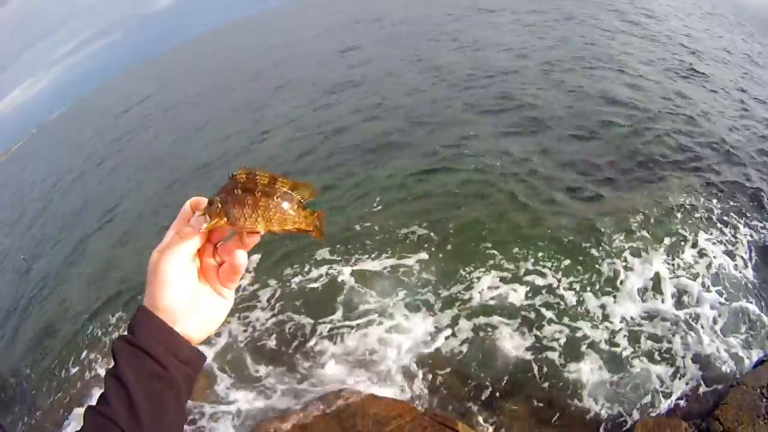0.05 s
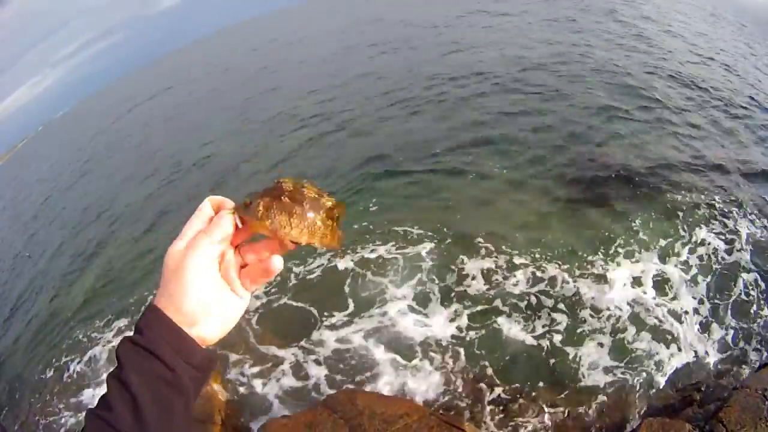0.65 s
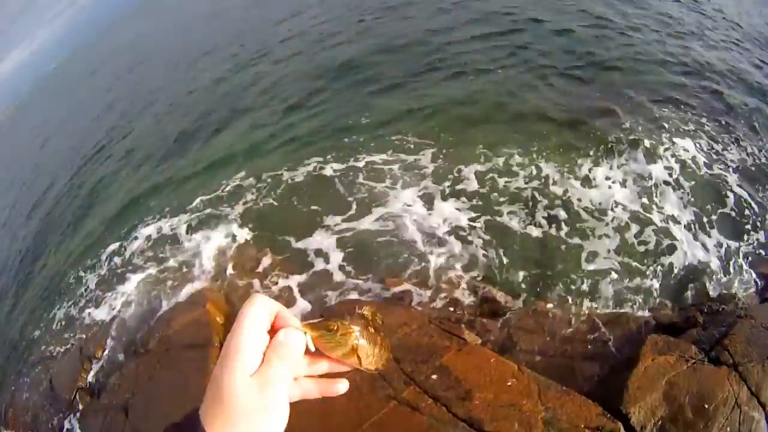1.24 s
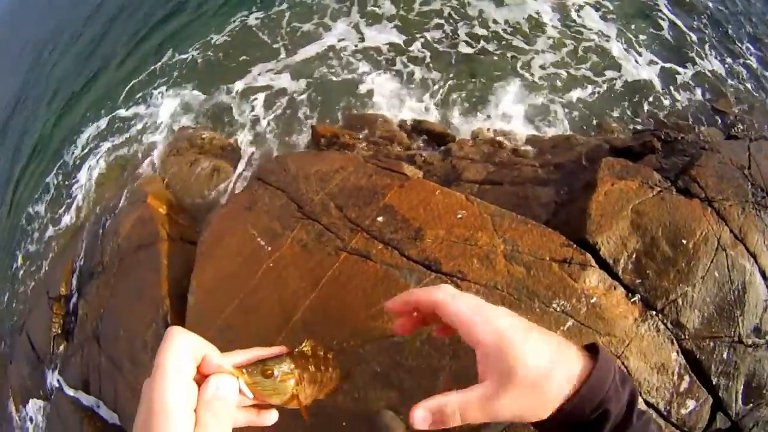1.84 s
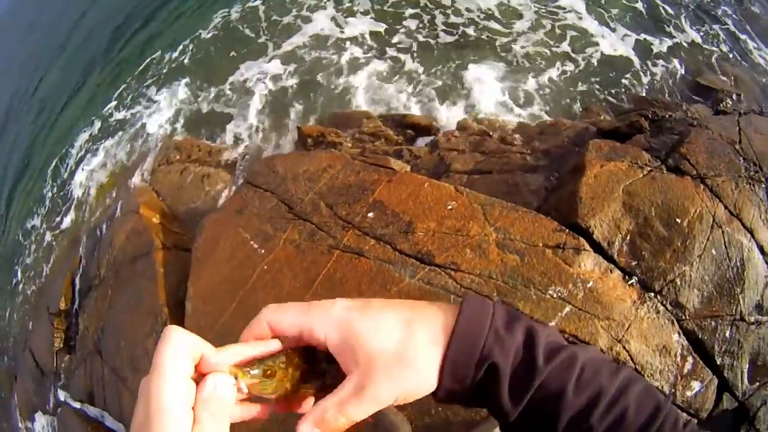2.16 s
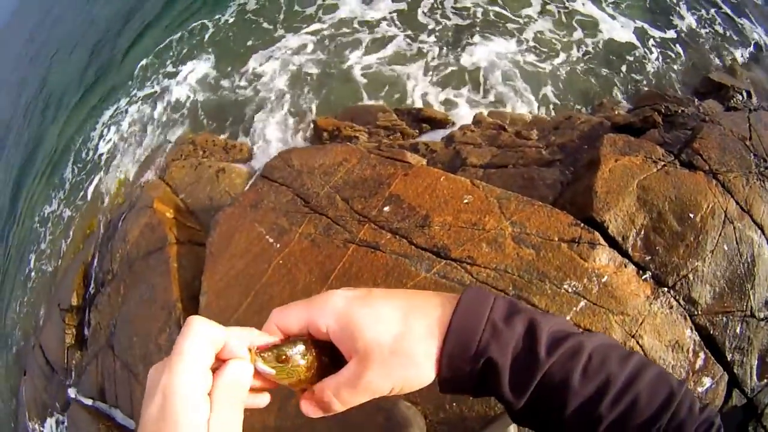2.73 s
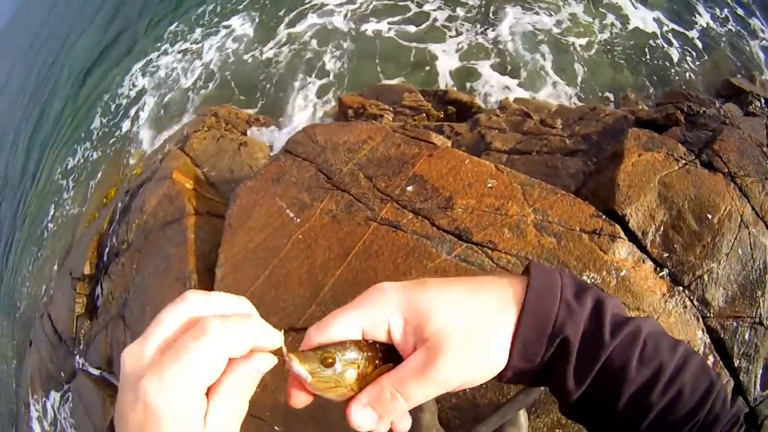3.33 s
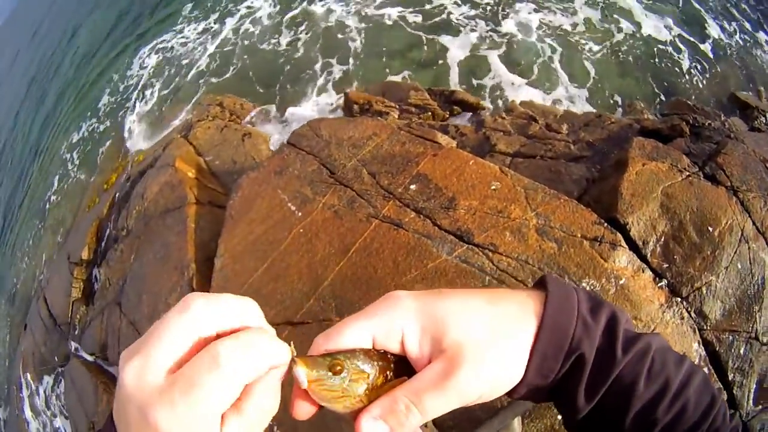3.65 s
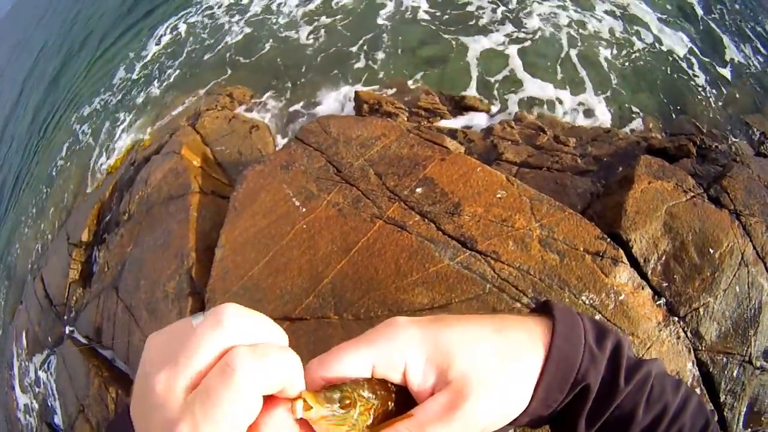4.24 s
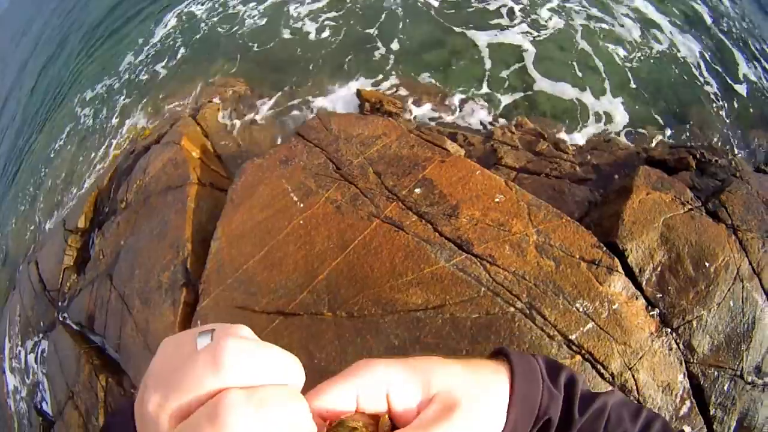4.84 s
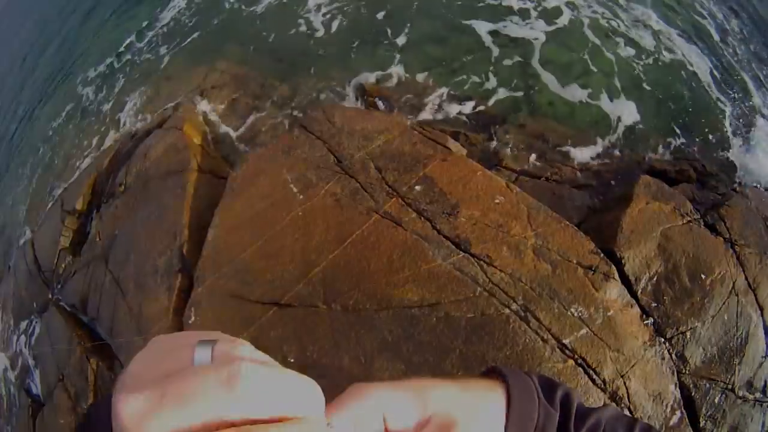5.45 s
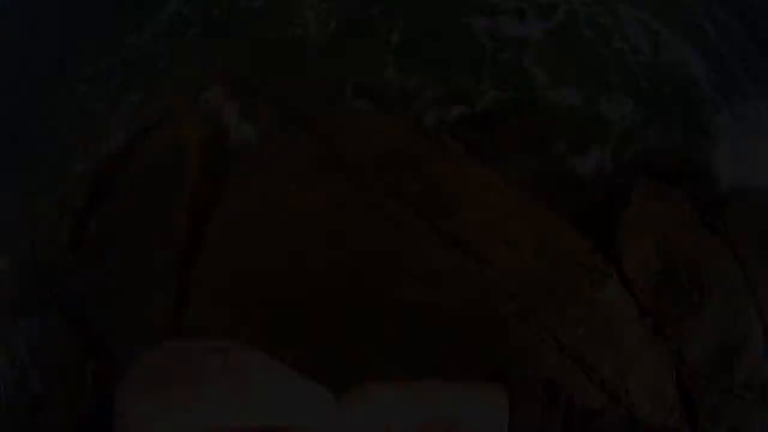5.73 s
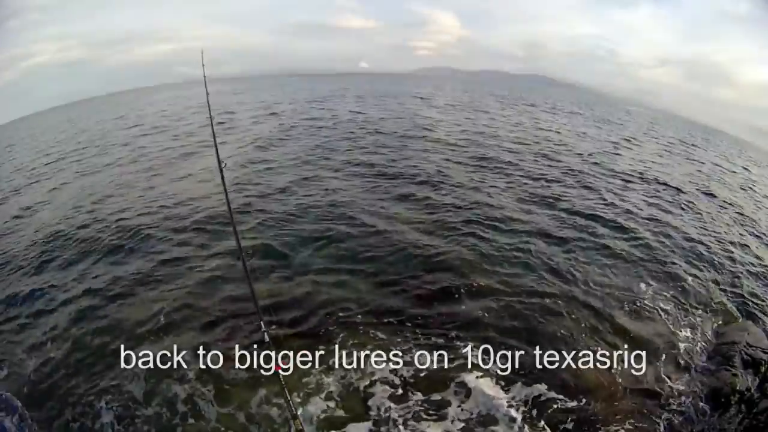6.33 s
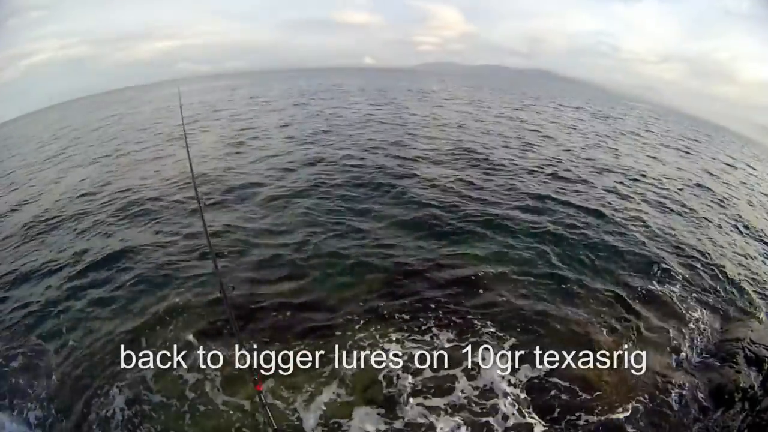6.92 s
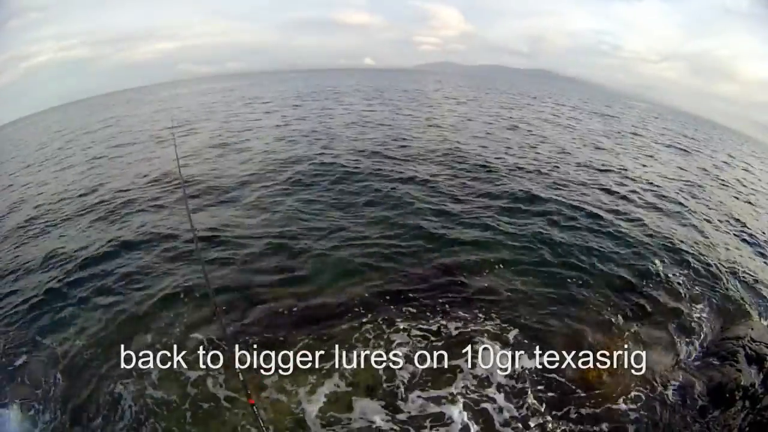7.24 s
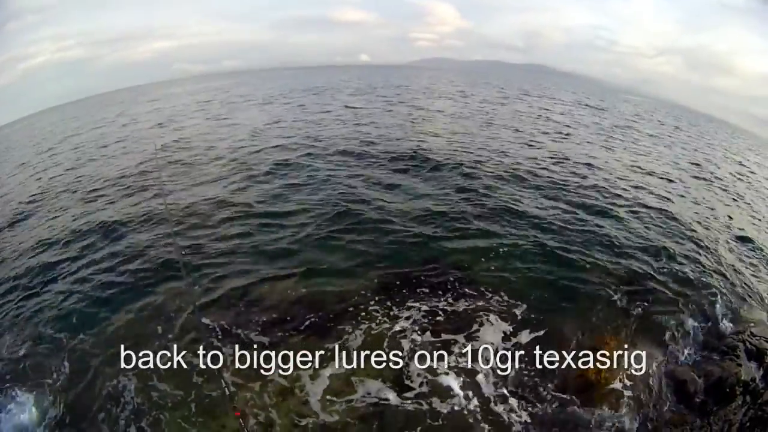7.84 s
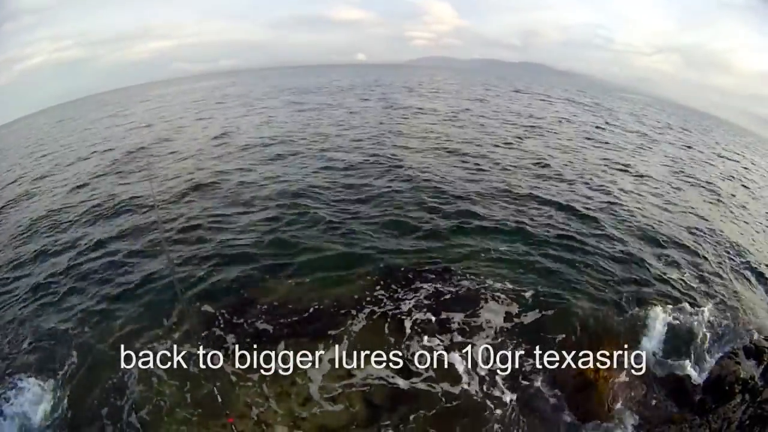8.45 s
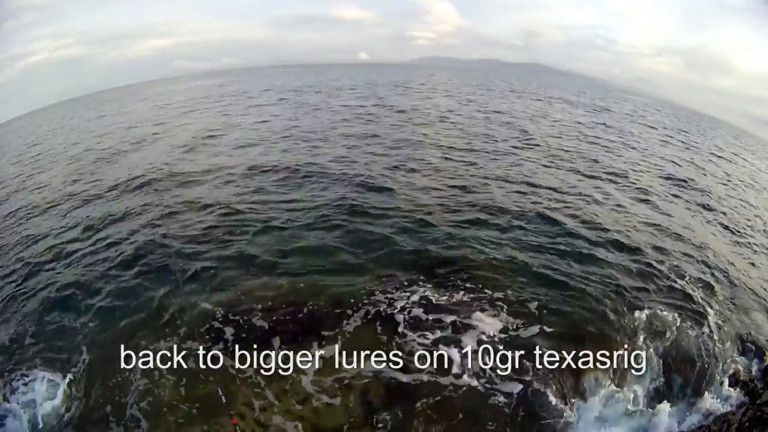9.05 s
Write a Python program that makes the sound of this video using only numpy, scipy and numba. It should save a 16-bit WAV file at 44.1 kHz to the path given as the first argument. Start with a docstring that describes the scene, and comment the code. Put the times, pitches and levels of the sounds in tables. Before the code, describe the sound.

Sea water washes and fizzes over shore rocks, faint, hollow and hissy as if heard from inside a closed waterproof housing.

```python
"""A rocky shore, heard faintly from inside a closed waterproof housing whose walls and cavity ring.
Low swell washes over the rocks: foam fizzes, bubbles burst and a few drops fall back into the water.
Each bubble is a damped resonator; thousands together make the wash, which swells with every wave.
A low flutter, soft pats and a faint rumble sit mostly on the right.
Two stretches at the shore follow each other through a fade to silence."""
import sys
import numpy as np
from scipy import signal
from scipy.fft import rfft, irfft
from scipy.io import wavfile
from numba import njit

SR = 44100
rng = np.random.default_rng(int(sys.argv[2]) if len(sys.argv) > 2 else 0)


def bounce(signal):
    """Save signal as a 16-bit WAV file at the path given by the first command-line argument."""
    frames = np.transpose(np.atleast_2d(signal))
    limited = np.clip(frames, -1, 1)
    pcm = np.round(limited * 32767).astype(np.int16)
    wavfile.write(sys.argv[1], SR, pcm)


N = 404838
TIME = np.arange(N) / SR
FREQ = np.maximum(np.arange(N // 2 + 1) * SR / N, 1)
CHANGE_S = 5.86  # the second stretch begins

# the low band of the wash, below about 720 Hz, swells and fades: (time [s], level [dB])
LOW_BAND_LEVEL = [(0, 0.5), (1.3, -3), (1.75, 7), (2.5, 11.5), (2.902, -16), (3.9, 11), (4.4, -6.5),
                  (4.8, 10), (5.3, 10.5), (5.7, 6.5), (6.4, -13), (7.95, -19), (8.45, 7), (9.152, 12.5)]


def undb(db):
    """Decibels to amplitude ratio."""
    return 10 ** (np.asarray(db) / 20)


def unit(x):
    """Normalisation to rms 1."""
    return x / np.sqrt(np.mean(x ** 2))


def contour(points):
    """Linear interpolation of (time [s], level [dB]) points."""
    return np.interp(TIME, *np.transpose(points))


def shape_db(points, freq):
    """Interpolation of (frequency [Hz], level [dB]) points on a log-frequency axis."""
    hz, db = np.transpose(points)
    return np.interp(np.log(freq), np.log(hz), db)


def colour(x, points):
    """Zero-phase filtering by a curve of (frequency [Hz], level [dB]) points."""
    return irfft(rfft(x) * undb(shape_db(points, FREQ)), N)


def walk(rate_hz):
    """Random modulation: straight lines join rate_hz Gaussian values a second."""
    return np.interp(TIME * rate_hz, np.arange(4096), rng.standard_normal(4096))


@njit
def bubbles(start_s, hz, cycles, amplitude, rise):
    """Damped resonance: a bubble decays 60 dB over its cycles, rising in pitch as it nears the surface."""
    out = np.zeros(N)
    for k in range(len(start_s)):
        first, length = int(start_s[k] * SR), int(cycles[k] / hz[k] * SR) + 2
        gain, phase = amplitude[k], 0.
        decay = np.exp(-np.log(1000) / length)
        for i in range(max(0, min(length, N - first))):
            phase += 2 * np.pi * hz[k] * (1 + rise * i / length) / SR
            gain *= decay
            out[first + i] += gain * np.sin(phase)
    return out


def foam(count=60000, spread_db=1.64, cycles=26, bubble_db=-5.5, rush_db=-0.5):
    """Superposition: thousands of near bubbles ring each second, while distant ones blur into noise."""
    when, pitch, ring, strength = rng.random((count, 4)).T
    hz = 700 + 10500 * pitch
    exponential = np.minimum(-np.log(1 - strength), 5)
    amplitude = undb(spread_db * exponential) * np.sqrt(hz)  # equal energy for high and low rings
    near = bubbles(when * N / SR, hz, cycles * (0.2 + 1.9 * ring), amplitude, rise=0.19)
    return undb(bubble_db) * unit(near) + undb(rush_db) * rng.standard_normal(N)


def surge(crest_s, rise_s, fall_s):
    """Power envelope of moving water: a Gaussian rise to the crest, then exponential decay."""
    since = TIME - crest_s
    exponent = np.where(since < 0, (since / rise_s) ** 2, since / fall_s)
    return np.exp(-np.minimum(exponent, 60))


def surf(foam_lag_s=0.079, foam_linger=1.11, foam_gain_db=2):
    """Incoherent addition: calm water, waves and splashes sum in power to gains of churn, fizz, spray."""
    # wash between waves, a row for each stretch: (churn [dB], fizz [dB], spray [dB])
    calm = [(-1.0, -3, -4), (-2.5, -4.5, -15)]
    # waves run up the rocks and drain: (time [s], rise [s], drain [s], level [dB], foam re water [dB])
    waves = [(0.05, 0.3, 0.7, -12, 7.5), (1.68, 0.13, 0.38, 2, -6.5), (2.15, 0.41, 0.68, -0.5, -5.5),
             (4.1, 0.81, 1.3, -18.5, 11.5), (5.32, 0.61, 0.56, -2, -1), (7.05, 0.38, 1.08, 1.5, -5),
             (8.2, 0.33, 1.9, -3, -4.5), (8.95, 0.069, 0.77, -6, -3)]
    # a crest slaps the rock: (time [s], level [dB], foam re water [dB])
    splashes = [(0.54, -14.5, 10), (1.56, -6, -8), (4.1, -2.5, -1), (4.96, -2, -7), (5.21, 2.5, -4),
                (5.3, 3, -4.5), (5.44, 2.5, -7), (6.68, -8.5, 4), (7.06, -8, 0), (7.36, -5, 0),
                (7.73, -10, 5), (8.11, 0, -10), (8.87, -0.5, -3.5), (9.15, 4.5, -4)]
    water = froth = 0
    for s, rise, drain, db, foam_db in waves:
        water += undb(db) ** 2 * surge(s, rise, drain)
        froth += undb(db + foam_db) ** 2 * surge(s + foam_lag_s, rise, drain * foam_linger)
    for s, db, foam_db in splashes:
        slap = surge(s, rise_s=0.031, fall_s=0.02)
        water += undb(db) ** 2 * slap
        froth += undb(db + foam_db) ** 2 * slap
    froth *= undb(foam_gain_db) ** 2
    return [np.sqrt(undb(np.where(TIME < CHANGE_S, before, after)) ** 2 + power)
            for before, after, power in zip(*calm, (water, froth, froth))]


def wash(edges_hz=(720, 4300, 6000), slop_db=0.22, lap_db=0.5, flicker_db=0.98, waver_db=6.5, gain_db=-57.5):
    """Amplitude modulation: of four bands, the upper three swell with the surf; each flickers alone."""
    spectrum = rfft(foam())
    high_passes = [1] + [1 / (1 + (edge / FREQ) ** 16) for edge in edges_hz] + [0]
    common_db = slop_db * walk(35) + lap_db * walk(8)
    low_gain = undb(contour(LOW_BAND_LEVEL) + waver_db * walk(9.8))  # the low band wavers at random
    out = 0
    for lower, upper, gain in zip(high_passes, high_passes[1:], [low_gain] + surf()):
        band = irfft(spectrum * (lower - upper), N)
        out += band * gain * undb(common_db + flicker_db * walk(70))
    return undb(gain_db) * out


def rock_echo(water, delay_s=0.0021, sway=0.13, echo_db=-14):
    """Comb filtering: the wash interferes with its reflection off the rock, whose path sways with it."""
    lag_s = delay_s * (1 + sway * walk(2.5))
    return water + undb(echo_db) * np.interp(TIME - lag_s, TIME, water)


def housing_response(resonances, size=2048):
    """Transmission through a resonant wall, as a minimum-phase impulse response."""
    # what the wall lets through: (frequency [Hz], level [dB])
    wall = [(400, -20.5), (600, -12), (1200, -18), (1370, -23), (1470, -10.5), (2900, -2.5), (4300, -1),
            (6000, -2), (7800, -5), (9500, -11), (14000, -18)]
    freq = np.maximum(np.arange(size // 2 + 1) * SR / size, 1)
    peaks_db = sum(lift * .5 ** ((2 * (freq - hz) / width) ** 2) for hz, width, lift in resonances)
    cepstrum = irfft(np.log(undb(shape_db(wall, freq) + peaks_db)))
    cepstrum[1:size // 2] *= 2  # folding the cepstrum makes the response causal
    cepstrum[size // 2 + 1:] = 0
    return irfft(np.exp(rfft(cepstrum)))


def housing():
    """Directional resonance: a response for each place of the loudest water, and its share over time."""
    # resonances and notches of the housing, by place: (frequency [Hz], bandwidth [Hz], gain [dB])
    open_water = [(1406, 685, 16), (1860, 204, 9.5), (2360, 670, 9), (3350, 260, 10), (3910, 410, 7),
                  (4810, 520, 9.5), (5340, 570, 8), (6000, 460, -3), (6720, 640, 6), (8650, 190, 8)]
    edge = [(1353, 814, 15.5), (1878, 220, 6.5), (2328, 576, 11), (3388, 290, 8.5), (3970, 290, 3),
            (4916, 640, 11.7), (5520, 280, 8), (6770, 950, 7), (8400, 310, 3), (2970, 79, -11)]
    below = [(1486, 1190, 9.9), (1850, 240, 6.2), (2480, 550, 9.9), (3330, 330, 9.7), (3850, 550, 3.1),
             (4820, 390, 11.4), (5430, 520, 8.2), (6830, 630, 9.8), (8730, 440, 6.8)]
    ahead = [(1610, 920, 11.7), (2400, 240, 7.8), (3415, 135, 6.9), (3895, 270, 6.5), (4936, 490, 8.6),
             (5380, 210, 8), (6600, 290, 4), (7270, 340, 5.7), (8570, 350, 8.5)]
    side = [(1530, 1120, 14.7), (2540, 840, 6.7), (3390, 430, 12.5), (3890, 310, 8.2), (4970, 920, 11.1),
            (5450, 200, 4.4), (5900, 460, 6.5), (6800, 520, 4.4), (8900, 4400, 4)]
    # where the loudest water is: (time [s], place [name])
    loudest_water = [(1.3, "open"), (1.6, "below"), (2.35, "below"), (3.3, "edge"), (5.8, "edge"),
                     (5.9, "ahead"), (7.7, "ahead"), (8.8, "side")]
    by_place = {"open": open_water, "edge": edge, "below": below, "ahead": ahead, "side": side}
    responses = np.array([housing_response(resonances) for resonances in by_place.values()])
    times, places = zip(*loudest_water)
    shares = np.array([np.interp(TIME, times, np.array(places) == place) for place in by_place])
    return responses, shares


def flutter(rate_hz=44, steepness=3.3, left_db=-11):
    """Random gating: low noise flickers on and off, independently on each side."""
    # spectrum of the flutter: (frequency [Hz], level [dB])
    spectrum = [(50, -15), (110, 7.5), (150, 0), (220, 2), (300, -1.5), (400, -15), (650, -23), (900, -20),
                (2500, -66)]
    # its slow swell: (time [s], level [dB])
    swell = [(0, -59.5), (1.3, -50), (1.7, -56), (2.8, -55), (3.7, -52.5), (4.2, -55.5), (5.2, -62.5),
             (6.0, -54.5), (6.6, -59.5), (9.1, -55)]
    gates = np.array([unit(1 + np.tanh(steepness * (walk(rate_hz) - .5))) for side in range(2)])
    noise = colour(rng.standard_normal((2, N)), spectrum)
    return noise * gates * undb(contour(swell)) * undb([[left_db], [0]])


def rumble(left_db=-20, waver_db=3.0, low_band_share=0.33, first_db=0.36, second_db=1.0):
    """Slow amplitude modulation: faint, deep noise wavers and swells with the low band of the wash."""
    # spectrum of the rumble: (frequency [Hz], level [dB])
    spectrum = [(15, -36.5), (45, -39.5), (90, -44.5), (140, -65), (280, -62.5), (430, -70.5), (1000, -89)]
    stretch_db = np.where(TIME < CHANGE_S, first_db, second_db)
    db = stretch_db + low_band_share * contour(LOW_BAND_LEVEL) + waver_db * np.tanh(walk(12))
    return colour(rng.standard_normal((2, N)), spectrum) * undb(db) * undb([[left_db], [0]])


def pats(reference_hz=390, left_db=-15, steepness=4.0, size=8192):
    """Windowed noise: each soft pat is a short, dull burst whose spectrum scales with its pitch."""
    # spectrum of a pat pitched at reference_hz: (frequency [Hz], level [dB])
    spectrum = [(60, -51), (200, -0.5), (300, 1), (500, -0.5), (760, -5.5), (1020, -13), (2500, -24.5)]
    # soft low pats: (time [s], level [dB], duration [s], pitch [Hz])
    bursts = [(0.099, -67.5, .045, 400), (0.236, -70, 0.067, 200), (0.463, -68.5, 0.049, 200),
              (0.573, -71, 0.056, 190), (0.76, -72, 0.025, 227), (0.868, -64, 0.013, 400),
              (1.527, -68, 0.033, 380), (1.857, -68, .012, 380), (1.938, -64, 0.046, 370),
              (2.057, -61, 0.031, 345), (2.152, -62, 0.023, 330), (2.286, -67.5, 0.045, 430),
              (2.366, -66.5, 0.057, 350), (2.437, -63, 0.038, 350), (2.629, -60, 0.03, 380),
              (2.692, -69.5, 0.022, 210), (2.786, -62.5, 0.022, 343), (2.89, -62.5, 0.073, 324),
              (3.073, -63, 0.043, 362), (3.171, -64.5, 0.042, 286), (3.252, -61, 0.035, 350),
              (3.365, -63, 0.018, 380), (3.401, -64, 0.045, 356), (3.474, -64.5, 0.054, 430),
              (3.583, -64, 0.026, 350), (3.767, -63, 0.018, 258), (3.837, -64, 0.012, 440),
              (3.913, -60.5, 0.041, 256), (3.995, -64, .018, 342), (4.275, -71, 0.036, 219),
              (4.397, -69, .026, 230), (4.658, -71, 0.047, 320), (4.76, -70, .028, 340),
              (4.903, -68, 0.047, 380), (5.394, -64.5, 0.024, 280), (6.109, -61, 0.041, 400),
              (6.196, -62.5, 0.012, 260), (6.317, -64, 0.012, 380), (6.451, -67.5, 0.018, 307),
              (6.585, -66.5, 0.026, 294), (6.685, -64.5, 0.01, 480), (6.788, -61, 0.016, 413),
              (6.881, -60, 0.0062, 450), (6.986, -59, 0.0075, 410), (7.085, -60.5, 0.013, 400),
              (7.188, -62.5, .011, 427), (7.298, -63.5, 0.017, 307), (7.479, -59.5, 0.013, 333),
              (7.581, -62, 0.016, 390), (7.745, -60.5, 0.021, 437), (7.983, -61.5, .015, 487),
              (8.06, -64, 0.051, 474), (8.228, -63.5, 0.031, 480), (8.456, -64.5, .04, 362)]
    out = np.zeros((2, N + size))
    freq = np.maximum(np.arange(size // 2 + 1) * SR / size, 1)
    for (s, db, duration, hz), noise in zip(bursts, rng.standard_normal((len(bursts), 2, size))):
        first = max(int(s * SR) - size // 2, 0)
        grain = irfft(rfft(noise) * undb(shape_db(spectrum, freq * reference_hz / hz)))
        since = (first + np.arange(size)) / SR - s
        window = np.exp(-np.abs(2 * since / duration) ** steepness)
        rms = undb(db) * np.sqrt(np.mean(window ** 2))
        out[:, first:first + size] += rms * np.array([unit(side * window) for side in grain])
    return out[:, :N] * undb([[left_db], [0]])


def drops(responses, shares, rise=0.21, detune=0.046, satellite_db=-4, count=6, size=4096):
    """Air entrainment: a drop traps one strong bubble, then weaker ones; all ring on in the housing."""
    # near drops and bursting bubbles: (time [s], peak level [dB], pitch [Hz], ring length [cycles])
    near_drops = [(0.98, -46, 4900, 18), (1.043, -44, 4990, 13), (1.211, -46, 5100, 16),
                  (1.4028, -45, 3400, 38), (1.4098, -45, 3740, 50), (1.892, -58, 1800, 74),
                  (2.7762, -44, 5270, 16), (3.5314, -47, 3730, 38), (3.708, -46, 5020, 30),
                  (3.986, -45, 4970, 32), (4.968, -50, 2130, 37), (5.215, -38, 5200, 20),
                  (5.989, -42, 4820, 36), (6.1698, -48, 4670, 48), (6.228, -56, 2260, 59),
                  (8.855, -47, 3390, 105), (9.076, -41, 3110, 24), (9.146, -49, 3460, 100)]
    out = np.zeros(N + 2 * size)
    satellite = np.arange(count) > 0
    for s, db, hz, cycles in near_drops:
        first = int(s * SR)
        delay_s = satellite * rng.random(count) * cycles / hz / 2
        pitch = hz * np.exp(detune * satellite * rng.standard_normal(count))
        plip = bubbles(delay_s, pitch, cycles / (1. + satellite), undb(satellite_db * satellite), rise)
        inside = signal.fftconvolve(plip[:size], shares[:, first] @ responses)
        out[first:first + len(inside)] += undb(db) * inside / np.abs(inside).max()
    return out[:N]


def scene(right_db=-6.0):
    """Convolution: the sea reaches both sides through one housing, the right weaker; low sounds add on."""
    responses, shares = housing()
    water = rock_echo(wash())
    sea = sum(share * signal.oaconvolve(water, response)[:N] for share, response in zip(shares, responses))
    sea += drops(responses, shares)
    return sea * undb([[0], [right_db]]) + pats() + flutter() + rumble()


def record(dry, fade_s=.49, cutoff_hz=14900):
    """Self-noise and band limiting: hiss, a low-pass, a steady offset and a fade between the stretches."""
    # hiss of the microphones: (frequency [Hz], level [dB])
    self_noise = [(30, -63.5), (70, -70), (200, -72), (450, -85), (620, -70.5), (780, -62), (1300, -63.5),
                  (3000, -64.5), (10000, -68), (15000, -77)]
    offset = np.array([[-.0053], [.0447]])
    hiss = colour(rng.standard_normal((2, N)), self_noise)
    fade = np.minimum(np.abs(TIME - CHANGE_S) / fade_s, 1)
    low_pass = signal.ellip(10, .1, 70, cutoff_hz, fs=SR, output="sos")
    return fade * (offset + signal.sosfilt(low_pass, dry + hiss))


dry = scene()
out = record(dry)
bounce(out)
```